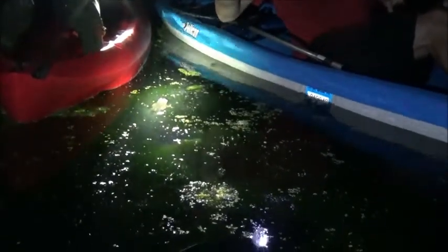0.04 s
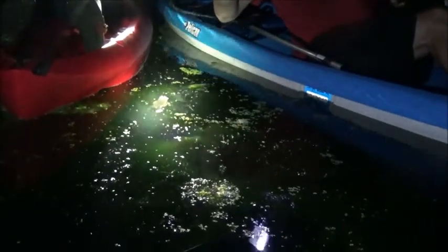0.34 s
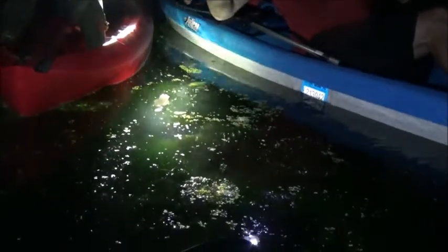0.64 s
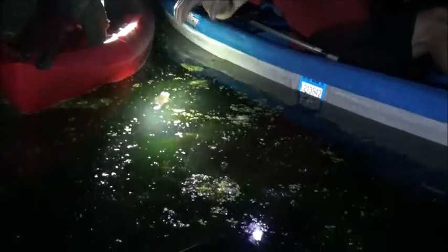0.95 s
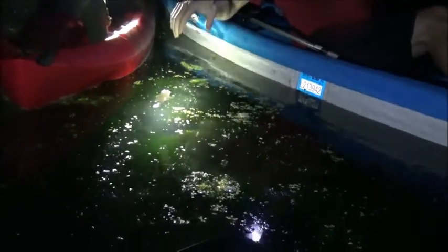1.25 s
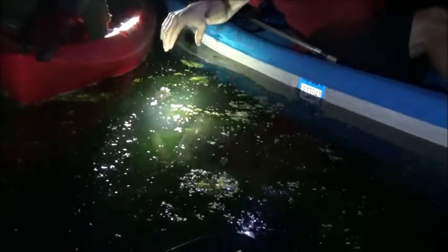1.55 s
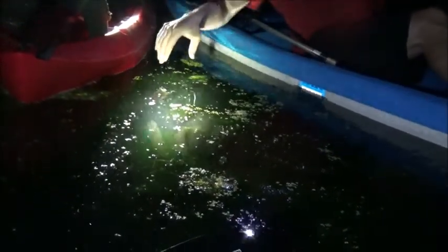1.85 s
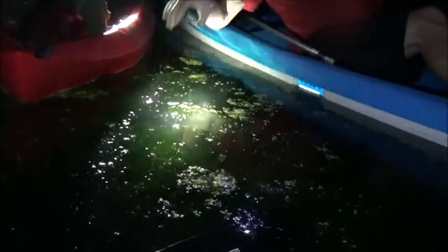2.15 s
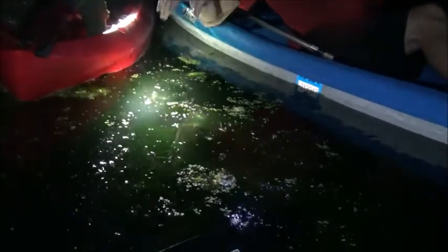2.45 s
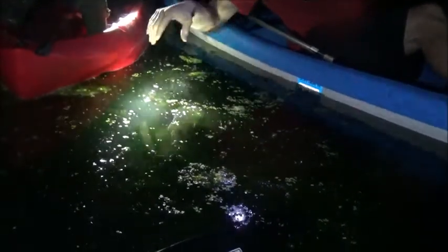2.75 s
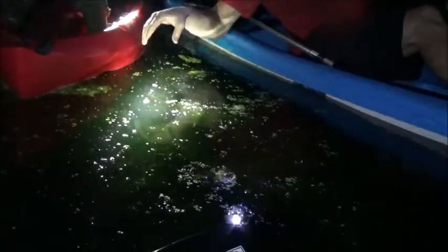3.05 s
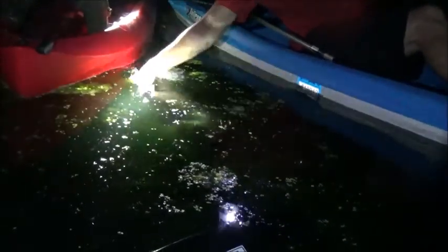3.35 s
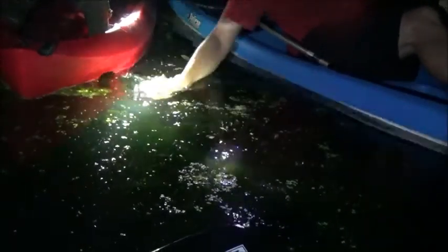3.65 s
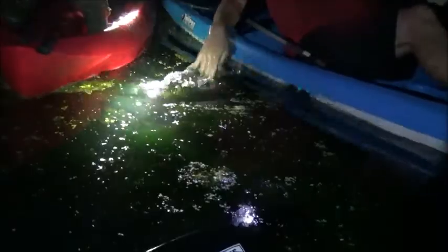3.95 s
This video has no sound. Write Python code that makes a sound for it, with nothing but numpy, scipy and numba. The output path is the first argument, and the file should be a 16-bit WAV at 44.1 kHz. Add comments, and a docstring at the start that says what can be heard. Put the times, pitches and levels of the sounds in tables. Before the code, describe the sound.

A hand splashes in still water, heard close. Drips tick at the start, and a plastic boat hull is softly bumped and rubbed around 0.2 seconds. Faint hiss and tiny pops follow, with light lapping at 2.3 and 3.1 seconds. At about 3.4 seconds the hand plunges with a rising gulp, then slaps the water loudest at 3.7, with bubbles and spray continuing to 4 seconds.

```python
"""Hand splash between boats at night

Still water, two small boats, faint hiss. A few drips tick and ring; a plastic hull is bumped.
Fingers break the surface, the hand plunges with a hiss and a rising gulp, then slaps the water.
Bubble clouds and spray follow. Short echoes off the hulls; close, almost mono."""
import sys
import numpy as np
from scipy import signal
from scipy.fft import rfft, irfft, next_fast_len
from scipy.io import wavfile
from scipy.ndimage import uniform_filter1d
from numba import njit

SR = 44100
rng = np.random.default_rng(int(sys.argv[2]) if len(sys.argv) > 2 else 0)


def int16_out(signal):
    """Quantize to a 16-bit WAV file."""
    q = np.round(np.clip(np.atleast_2d(signal).T, -1, 1) * 32767)
    wavfile.write(sys.argv[1], SR, q.astype(np.int16))


N = 176400
T = np.arange(N) / SR

# far hiss; its side channel relative to mid (frequency [Hz], gain [dB])
HISS_EQ = [(15, -81), (25, -50), (59, -18.5), (92, -21), (123, -9.5), (149, -18.5), (180, 2), (206, -9.5),
           (229, -1), (263, -9), (476, -6.5), (887, -6), (1330, -11), (5000, -18), (9070, -18.5),
           (16000, -25)]
HISS_SIDE_EQ = [(200, -21), (380, -8), (1300, -1.5), (4400, -5), (8100, -7.5), (15000, -31)]
# far drone (frequency [Hz], level [dB])
DRONE_PARTIALS = [(182, -68), (363, -70), (692, -70.5), (908, -68.5)]
# drops trapping one bubble (time [s], pitch [Hz], level [dB], t60 [s], tick re ring [dB])
DRIPS = [(0.0663, 2640, -31, 0.035, 4), (0.066, 3100, -29, 0.011, 1), (0.103, 9600, -25, 0.0086, -10),
         (0.103, 5000, -40, 0.0085, -10), (2.2112, 3045, -27, 0.018, -2),
         (2.878, 10000, -26.5, 0.0023, -6.5), (3.243, 9500, -28, .008, -1.5),
         (3.259, 10450, -21, 0.0017, -8.5), (3.2928, 5150, -27, 0.0083, 10),
         (3.3076, 9930, -20, 0.0028, -5), (3.332, 1080, -25.5, 0.033, -1.5),
         (3.3977, 11060, -7.5, 0.0033, -22), (3.4001, 10100, -13.5, 0.012, -10),
         (3.4094, 1535, -18.5, 0.027, -27), (3.413, 1960, -27.5, 0.035, -17), (3.52, 2316, -33.5, .05, 10),
         (3.537, 1180, -28, 0.036, -7), (3.595, 1623, -29.5, 0.03, -8), (3.616, 853, -22, 0.061, -17),
         (3.629, 2440, -24, 0.019, 3), (3.647, 3606, -22.5, 0.02, 5.5), (3.673, 3890, -20, 0.023, -10.5),
         (3.742, 1099, -20, 0.077, -15), (3.748, 977, -24.5, .2, -15), (3.778, 1567, -26.5, 0.093, -12),
         (3.769, 3720, -16.5, 0.017, -18), (3.794, 2130, -21.5, 0.051, -0.5),
         (3.7933, 2450, -16, 0.029, -14), (3.858, 2210, -28, 0.11, -5.5), (3.882, 3500, -23, 0.03, -2.5),
         (3.902, 2380, -29, 0.03, 2), (3.927, 2474, -26, 0.032, 0), (3.992, 4150, -28, 0.014, 1.5)]
# drop impact (frequency [Hz], gain [dB])
TICK_EQ = [(300, -98), (1800, -38), (2800, 1.5), (4500, 6.5), (7000, 5), (10000, 7.5), (16000, -11)]
# hull bumps; wavelets under the hull (time [s], level [dB], t60 [s], pitch [Hz])
BUMPS = [(0.1677, -27, .035, 265), (.1795, -30, 0.047, 176)]
CLUCKS = [(3.0802, -31, .03, 574), (3.127, -41, .018, 706), (3.146, -40.5, 0.08, 425),
          (3.2036, -32.5, 0.045, 301), (3.238, -35.5, .03, 746)]
# their contacts (frequency [Hz], gain [dB])
BUMP_EQ = [(60, -24), (200, -3), (480, 0), (620, -1), (850, -34), (9000, -36)]
CLUCK_EQ = [(100, -32), (400, -3), (1200, 2.5), (2000, -14), (4000, -26), (9000, -42)]
# hull resonances (frequency [Hz], level [dB], t60 [s])
HULL_MODES = [(81, -55, 0.98), (114.2, -48.5, 0.79), (132.4, -43, 0.57), (184.5, -48, 0.26),
              (255, -50, 0.58), (329, -48.5, 0.37)]
# slide over the hull; ripple against it (time [s], level [dB])
SLIDE_ENV = [(.165, -62), (.171, -47.5), (.205, -50), (.25, -38.5), (.262, -44.5), (.283, -45.5),
             (.297, -51), (.315, -72)]
LAP_ENV = [(2.30, -71), (2.325, -44), (2.337, -62), (2.346, -40.5), (2.375, -51.5), (2.43, -61)]
# their spectra (frequency [Hz], gain [dB])
SLIDE_EQ = [(40, -42), (130, 7.5), (300, 1), (550, 1), (800, -3.5), (1300, -4.5), (5000, -12), (9000, -13),
            (16000, -33)]
LAP_EQ = [(150, -19), (450, 2.5), (750, -8.5), (1100, 4), (1700, -25), (3000, -17), (4000, -13.5),
          (5200, -24), (15000, -27)]
# large air pockets (time [s], length [s], first pitch [Hz], last pitch [Hz], level [dB])
GULPS = [(.236, 0.03, 586, 530, -39.5), (0.26, 0.037, 1150, 1340, -47), (2.32, 0.098, 418, 535, -46),
         (2.3, 0.085, 1153, 960, -54), (3.466, 0.047, 495, 360, -32), (3.49, 0.096, 331, 324, -39.5),
         (3.683, 0.009, 950.1, 799.7, -20.5), (3.687, 0.0109, 680, 560, -14),
         (3.712, 0.044, 840, 1160, -21), (3.71, 0.037, 580.6, 633, -23.5), (3.77, 0.062, 554, 375, -33),
         (3.803, 0.01866, 626.2, 469.5, -25), (3.806, 0.039, 341, 583.1, -28.5),
         (3.846, 0.031, 565.4, 418, -30.5), (3.886, 0.16, 282, 255, -44.5)]
# far bubble bursts; droplets landing without a ring (time [s], level [dB])
POPS = [(.4625, -37), (.541, -35), (.96, -33), (.9815, -32), (1.217, -31), (1.271, -34.5), (1.6065, -35),
        (1.8365, -30), (1.8972, -32.5), (2.1055, -35), (2.437, -34)]
DROPLETS = [(3.477, -25.5), (3.5195, -17), (3.5415, -19.5), (3.5728, -23), (3.6765, -16), (3.7995, -15),
            (3.8195, -16.5), (3.842, -21), (3.9245, -27), (3.977, -29)]
# their spectra (frequency [Hz], gain [dB])
POP_EQ = [(3000, -20), (6000, -5), (9000, 0), (11000, -3), (14000, -12)]
DROPLET_EQ = [(400, -26), (2600, 1.5), (9500, 1.5), (12500, -13), (16000, -22)]
# clouds: fine spray, small bubbles, large bubbles (time [s], level [dB])
SPRAY_ENV = [(3.226, -77), (3.245, -50), (3.322, -64), (3.335, -31), (3.345, -52), (3.351, -28.5),
             (3.359, -32), (3.365, -21), (3.379, -34.5), (3.42, -52.5), (3.47, -51), (3.481, -38),
             (3.513, -48), (3.522, -35.5), (3.541, -34), (3.56, -43), (3.606, -49), (3.66, -43.5),
             (3.679, -27.5), (3.685, -40.5), (3.692, -26.5), (3.728, -41.5), (3.749, -27), (3.764, -39.5),
             (3.80, -33.5), (3.825, -33.5), (3.854, -45), (3.926, -42), (3.961, -61.5), (3.973, -40.5),
             (4, -51)]
FIZZ_ENV = [(3.319, -71), (3.335, -35.5), (3.343, -46), (3.365, -35.5), (3.383, -29.5), (3.40, -52),
            (3.459, -48), (3.484, -35.5), (3.515, -41.5), (3.57, -37), (3.606, -39.5), (3.66, -35),
            (3.684, -35.5), (3.695, -22.5), (3.707, -30), (3.722, -25), (3.748, -24), (3.765, -29.5),
            (3.78, -25.5), (3.82, -31.5), (3.87, -35.5), (3.925, -39.5), (3.96, -46), (4, -39)]
CHURN_ENV = [(3.32, -53), (3.346, -42.5), (3.385, -49), (3.49, -48), (3.559, -45), (3.58, -36.5),
             (3.651, -41), (3.681, -35.5), (3.694, -22.5), (3.705, -28.5), (3.72, -25.5), (3.76, -28),
             (3.82, -36.5), (3.87, -35.5), (3.92, -44), (4, -46)]
# their spectra (frequency [Hz], gain [dB])
SPRAY_EQ = [(2500, -16), (4500, -1), (6500, -4), (8000, 3), (10000, 6), (12000, 1), (14000, -3),
            (16000, -17)]
FIZZ_EQ = [(900, -19.5), (1500, -4), (2200, -2), (3000, 0.5), (4000, -4), (5500, -3), (9000, -23)]
CHURN_EQ = [(60, -60), (120, 8), (280, -4), (700, -2), (1050, 5.5), (1400, -0.5), (2200, -20), (6000, -44)]
# hollow behind the hand; its trapped air rising (time [s], resonance [Hz], level [dB])
HOLLOW_TRACK = [(3.364, 4230, -56), (3.373, 2900, -26), (3.379, 2000, -23), (3.385, 1170, -25.5),
                (3.392, 760, -42), (3.401, 380, -38.5), (3.408, 300, -68)]
PLOP_TRACK = [(3.393, 270, -68.5), (3.401, 274, -38.5), (3.413, 276, -40.5), (3.432, 363, -34.5),
              (3.448, 598, -23.5), (3.457, 790, -30), (3.467, 916, -30), (3.475, 1016, -25.5),
              (3.481, 1080, -46)]
# blows of the hand and of falling water (time [s], level [dB], decay [s])
SLAPS = [(3.6928, -2.5, .0028), (3.718, -12, .002), (3.7202, -10, .0018), (3.7414, -7.5, .0016),
         (3.7615, -16, .0015), (3.7785, -17, .003), (3.7945, -16, .002)]
# slap spectrum; sound scattered sideways by the water (frequency [Hz], gain [dB])
SLAP_EQ = [(40, -66), (280, -25), (520, -3), (700, 2), (1100, -1), (1500, -11), (2300, 0), (3800, -9),
           (5500, -14), (9400, -13), (16000, -40)]
SCATTER_EQ = [(100, -70), (380, -23), (1300, -14.5), (2500, -18.5), (4600, -9.5), (8000, -13),
              (15000, -27.5)]


def amp(db):
    """dB to gain."""
    return 10 ** (np.asarray(db) / 20)


def unit(x):
    """Scale to rms 1."""
    return x / np.sqrt(np.mean(x ** 2) + 1e-20)


def envelope(rows):
    """Gain from (time [s], ..., level [dB]) rows; silent outside them."""
    rows = np.array(rows)
    return amp(np.interp(T, rows[:, 0], rows[:, -1], left=-200, right=-200))


def colour(x, eq):
    """Minimum-phase EQ by folded cepstrum."""
    hz, db = np.array(eq).T
    size = next_fast_len(len(x) + 4096, True) // 2 * 2
    bin_hz = np.arange(size // 2 + 1) * SR / size
    gain = amp(np.interp(np.log(bin_hz + 1), np.log(hz), db))
    cepstrum = irfft(np.log(gain))
    cepstrum[1:size // 2] *= 2
    cepstrum[size // 2 + 1:] = 0
    return irfft(rfft(x, size) * np.exp(rfft(cepstrum)))[:len(x)]


def low_cut(x, hz):
    """Second-order high-pass."""
    return signal.sosfilt(signal.butter(2, hz, "high", fs=SR, output="sos"), x)


@njit
def band(x, centre_hz, width):
    """Swept state-variable band-pass; width = 1/Q."""
    y = np.empty(len(x))
    band_state, low_state = 0., 0.
    for i in range(len(x)):
        g = np.tan(np.pi * centre_hz[i] / SR)
        v = (band_state + g * (x[i] - low_state)) / (1 + g * (g + width))
        band_state = 2 * v - band_state
        low_state += 2 * g * v
        y[i] = width * v
    return y


def noise(eq):
    """Coloured noise, rms 1."""
    return unit(colour(rng.standard_normal(N), eq))


def wander(rate_hz):
    """Interpolated random values, spread near 1."""
    return np.interp(T * rate_hz, np.arange(4096), rng.standard_normal(4096))


def sine(hz):
    """Sine along a pitch curve."""
    return np.sin(2 * np.pi * np.cumsum(hz) / SR)


def add(out, start_s, x):
    """Mix x into out."""
    i = int(np.clip(start_s * SR, 0, N))
    out[i:i + len(x)] += x[:N - i]


def ring(hz, t60_s, rise_oct=0):
    """Struck resonance; pitch rises by rise_oct over the decay."""
    t = T[:int(t60_s * SR) + 2]
    return sine(hz * 2 ** (rise_oct * t / t60_s)) * np.exp(-np.log(1000) * t / t60_s)


def radiate(hz, t60_s, rise_oct=0):
    """Ring as it reaches the air: thin below its own pitch."""
    return low_cut(ring(hz, t60_s, rise_oct), 0.55 * hz)


def click(eq, decay_s):
    """Sharp contact with a brief rough tail, peak 1."""
    t = T[:1024]
    tail = rng.standard_normal(len(t)) * np.exp(-t / decay_s)
    x = colour(4 * (t == 0) + tail, eq)
    return x / np.abs(x).max()


def knocks(rows, contact_eq):
    """Each knock: a damped body plus its contact click."""
    out = np.zeros(N)
    for start_s, db, t60_s, hz in rows:
        add(out, start_s, 0.5 * amp(db) * radiate(hz, t60_s))
        add(out, start_s, 0.72 * amp(db) * click(contact_eq, decay_s=0.00027))
    return out


def night(hiss_db=-53):
    """Steady far hiss with a faint wavering drone, stereo."""
    mid = amp(hiss_db + 0.25 * wander(6.05)) * noise(HISS_EQ)
    for hz, db in DRONE_PARTIALS:
        gain = amp(db + 2 * wander(5.25))
        mid += gain * unit(sine(hz * (1 + 0.00618 * wander(9.8))))
    side = amp(hiss_db) * colour(noise(HISS_EQ), HISS_SIDE_EQ)
    return np.array([mid + side, mid - side])


def whine(hz=8070.0, db=-72):
    """Faint narrow band in the hiss."""
    return amp(db) * unit(band(rng.standard_normal(N), np.full(N, hz), width=0.03))


def drips(tick_decay_s=0.00093, spatter_decay_s=0.0066):
    """Each drop ticks, spatters and leaves a ringing bubble."""
    rings, ticks = np.zeros(N), np.zeros(N)
    t = T[:1024]
    burst = 0.21 * np.exp(-t / tick_decay_s) + amp(-20.5) * np.exp(-t / spatter_decay_s)
    for start_s, hz, db, t60_s, tick_db in DRIPS:
        add(rings, start_s, amp(db) * radiate(hz, t60_s, rise_oct=0.025))
        impact = burst * rng.standard_normal(len(t)) + 0.5 * (t == 0)
        add(ticks, start_s, amp(db + tick_db) * impact)
    return rings + colour(ticks, TICK_EQ)


def bumps():
    """Two dull bumps; the first rings the hull's modes."""
    out = knocks(BUMPS, BUMP_EQ)
    for hz, db, t60_s in HULL_MODES:
        add(out, BUMPS[0][0], amp(db) * ring(hz, t60_s))
    return out


def slide():
    """Something rubs unevenly across the hull."""
    return noise(SLIDE_EQ) * envelope(SLIDE_ENV) * amp(1.5 * wander(200))


def gulps(peak_share=0.43, waver_oct=0.02):
    """Air pockets ring while changing shape: swell, glide, wobble, fade."""
    out = np.zeros(N)
    bend_oct = waver_oct * wander(130)
    for start_s, length_s, first_hz, last_hz, db in GULPS:
        progress = np.linspace(0, 1, int(length_s * SR))
        i = int(rng.random() * N / 2)
        hz = first_hz * (last_hz / first_hz) ** progress * 2 ** bend_oct[i:i + len(progress)]
        shape = np.sin(np.pi * np.interp(progress, [0, peak_share, 1], [0, 0.5, 1]))
        add(out, start_s, amp(db) * shape * sine(hz))
    return out


def pops(decay_s=0.0006, faint_db=-51, spread_db=8):
    """Tiny bubbles burst farther off, the faintest at random."""
    out = np.zeros(N)
    t = T[:1024]
    faint = [(when * T[-1], faint_db - spread_db * cut) for when, cut in rng.random((45, 2))]
    for start_s, db in list(POPS) + faint:
        add(out, start_s, amp(db) * rng.standard_normal(len(t)) * np.exp(-t / decay_s))
    return colour(out, POP_EQ)


def lap():
    """A ripple washes against the hull."""
    return noise(LAP_EQ) * envelope(LAP_ENV)


def clucks():
    """Wavelets knock under the hull."""
    return knocks(CLUCKS, CLUCK_EQ)


def cloud(eq, levels, count, range_hz, t60_cycles, spread_db, noise_db):
    """Random bubbles ring over rushing noise; louder and denser as the water is stirred."""
    low_hz, high_hz = range_hz
    rings, stirring = np.zeros(N), envelope(levels)
    births = np.cumsum(np.sqrt(stirring))
    for when, pitch, size, life, sign in rng.random((count, 5)):
        start_s = np.searchsorted(births, when * births[-1]) / SR
        hz = low_hz * (high_hz / low_hz) ** pitch
        gain = amp(-spread_db * np.log(1 - 0.97 * size)) * np.sign(sign - 0.5)
        add(rings, start_s, gain * ring(hz, t60_cycles * (0.5 + life) / hz, rise_oct=0.19))
    rings = colour(rings, eq)
    # flatten, so that stirring alone sets the level
    rings /= np.sqrt(np.abs(uniform_filter1d(rings ** 2, size=1000)) + 1e-6)
    return (rings + amp(noise_db) * noise(eq)) * stirring


def droplets(decay_s=0.00092, shower_db=7, spread_db=12):
    """Thrown water patters back: clear ticks in a lesser shower that follows the fizz level."""
    clear, shower = np.zeros(N), np.zeros(N)
    for start_s, db in DROPLETS:
        add(clear, start_s, amp(db) * click(DROPLET_EQ, decay_s))
    first_s = FIZZ_ENV[0][0]
    for when, cut in rng.random((55, 2)):
        start_s = first_s + when * (T[-1] - first_s)
        add(shower, start_s, amp(shower_db - spread_db * cut) * click(DROPLET_EQ, decay_s))
    return clear + shower * envelope(FIZZ_ENV)


def plunge(width=0.49):
    """Rushing water sounds the deepening hollow behind the hand; the resonance falls."""
    time_s, hz, _ = np.array(HOLLOW_TRACK).T
    centre_hz = np.interp(T, time_s, hz)
    rush = band(band(rng.standard_normal(N), centre_hz, width), centre_hz, width)
    return unit(rush / np.sqrt(centre_hz)) * envelope(HOLLOW_TRACK)


def plop():
    """The hollow's trapped air rises to the surface; the pitch climbs."""
    time_s, hz, _ = np.array(PLOP_TRACK).T
    flutter = amp(3.4 * wander(250))
    return unit(sine(np.interp(T, time_s, hz))) * flutter * envelope(PLOP_TRACK)


def slaps(attack_s=0.000098, pulse_db=1, torn_db=-14):
    """Each blow: a pressure pulse and a short burst of torn water."""
    pulses, bursts = np.zeros(N), np.zeros(N)
    for start_s, db, decay_s in SLAPS:
        add(pulses, start_s, amp([db]))
        add(bursts, start_s, amp(db) * np.exp(-T / decay_s) * (1 - np.exp(-T / attack_s)))
    impulse = 1.0 * (T[:SR // 10] == 0)
    peak = np.abs(colour(impulse, SLAP_EQ)).max()
    return amp(pulse_db) * colour(pulses, SLAP_EQ) / peak + amp(torn_db) * bursts * noise(SLAP_EQ)


def reflections(near, echo_db=-17, t60_s=0.064, delay_s=0.0049, scatter_s=0.0018):
    """Mono to stereo: short hull echoes; the water scatters differently to each side."""
    t = T[:SR // 4]
    echoes = rng.standard_normal(len(t)) * np.exp(-np.log(1000) * t / t60_s) * (t > delay_s)
    scatter = rfft(rng.standard_normal(len(t)) * np.exp(-t / scatter_s))
    all_pass = irfft(scatter / np.abs(scatter))[:len(t) // 2]
    mid = near + amp(echo_db) * signal.fftconvolve(near, echoes / np.linalg.norm(echoes))[:N]
    side = colour(signal.fftconvolve(near, all_pass)[:N], SCATTER_EQ)
    return np.array([mid + side, mid - side])


def scene():
    """Splashes in front, hull slightly right, night all round."""
    bubbles = drips() + pops() + droplets()
    bubbles += cloud(SPRAY_EQ, SPRAY_ENV, count=1400, range_hz=(4793, 15500),
                     t60_cycles=30, spread_db=5.5, noise_db=-7)
    bubbles += cloud(FIZZ_EQ, FIZZ_ENV, count=600, range_hz=(1468, 4611),
                     t60_cycles=38, spread_db=3, noise_db=-14)
    bubbles += cloud(CHURN_EQ, CHURN_ENV, count=140, range_hz=(431, 1350),
                     t60_cycles=19, spread_db=2, noise_db=-8)
    bubbles = low_cut(bubbles, hz=294)  # small bubbles radiate little bass
    water = low_cut(bubbles + plunge() + plop() + slaps(), hz=180) + gulps()
    hull = low_cut(bumps() + clucks() + slide() + lap(), hz=60.4)
    pan_db = [[-0.25], [0.25]]
    return reflections(hull) * amp(pan_db) + whine() + reflections(water) + night()


def record(dry):
    """Steep 16 kHz low-pass."""
    return signal.sosfilt(signal.ellip(10, 0.2, 80, 16000, fs=SR, output="sos"), dry)


dry = scene()
out = record(dry)
int16_out(out)
```